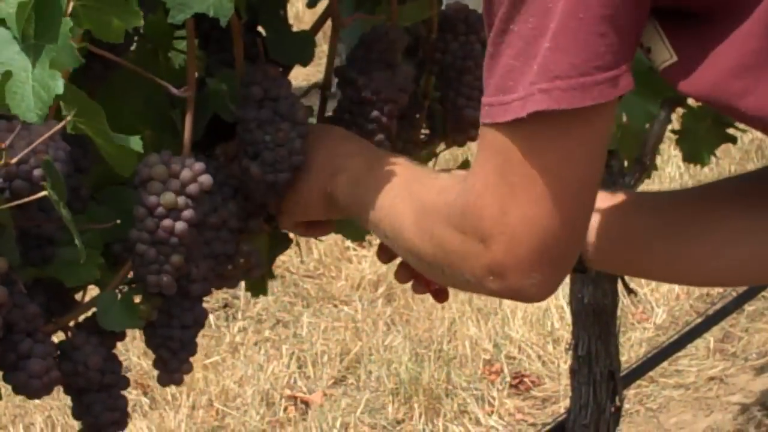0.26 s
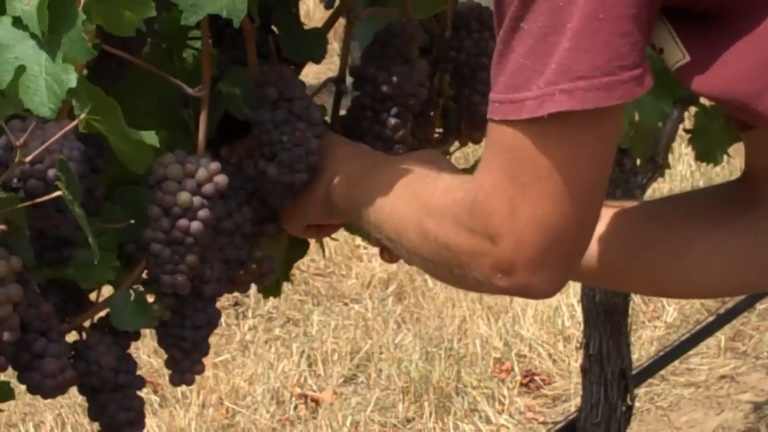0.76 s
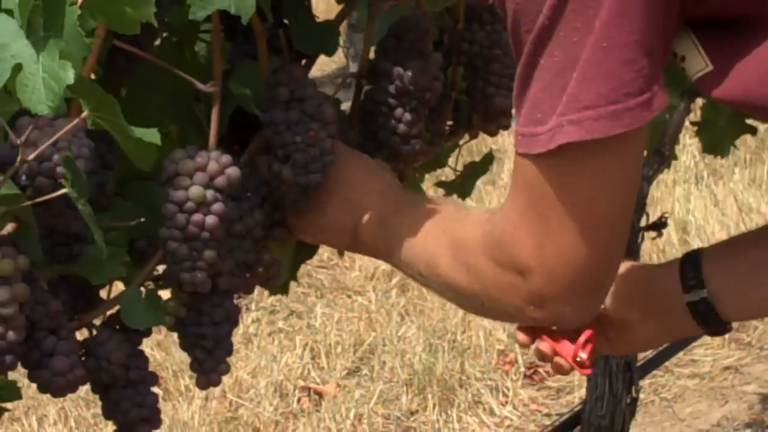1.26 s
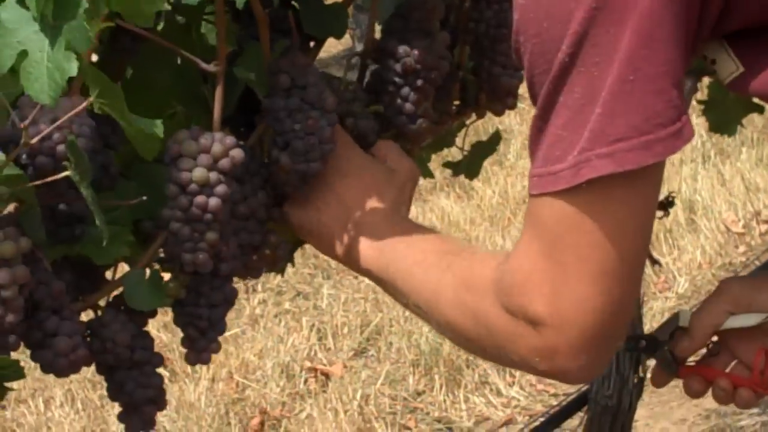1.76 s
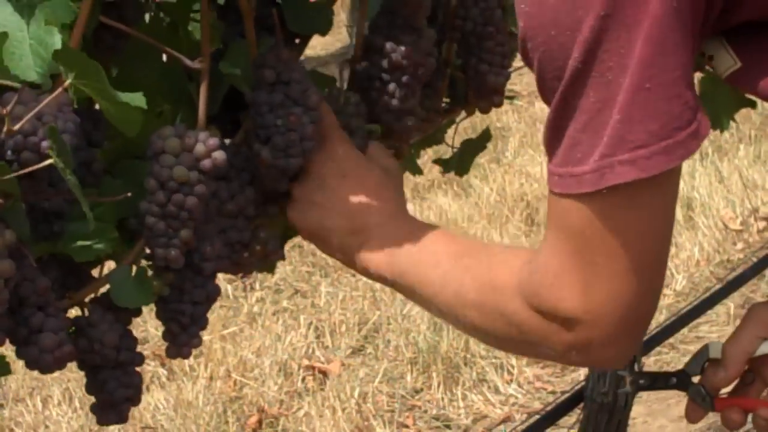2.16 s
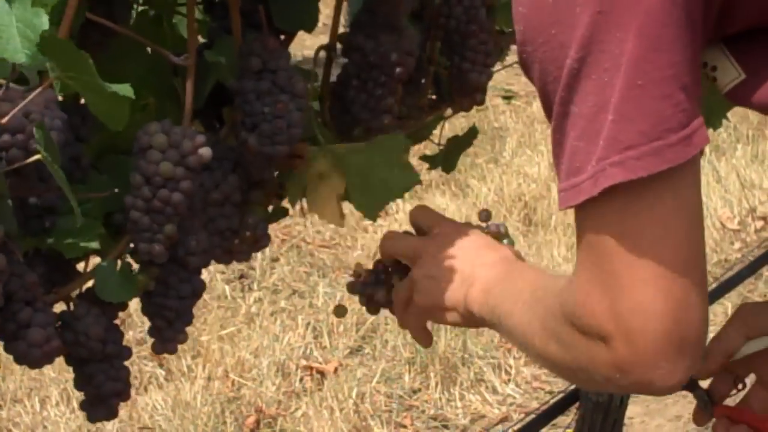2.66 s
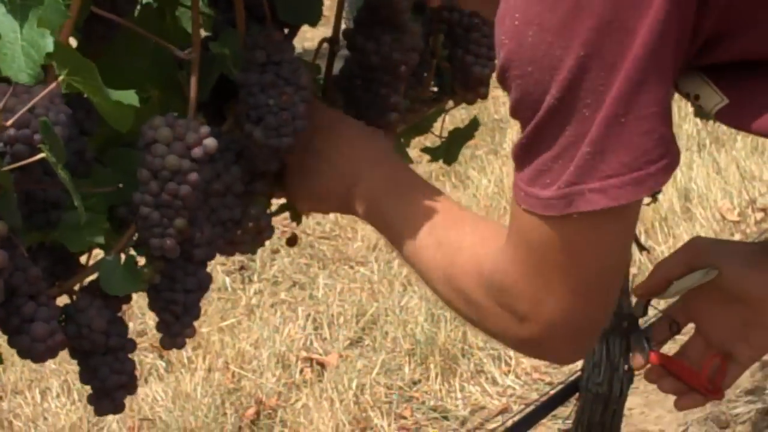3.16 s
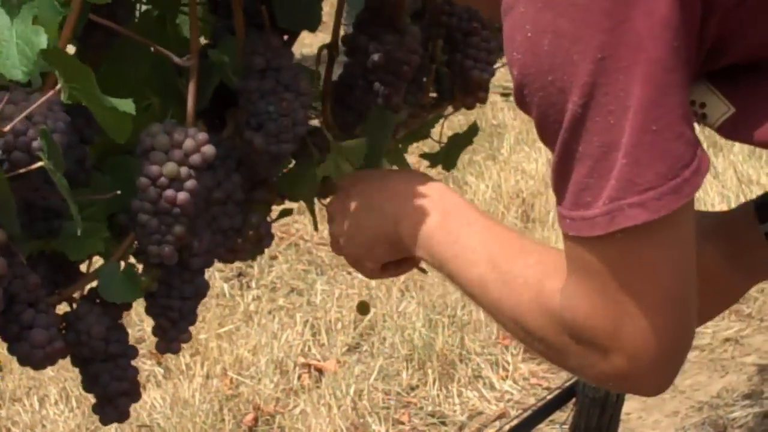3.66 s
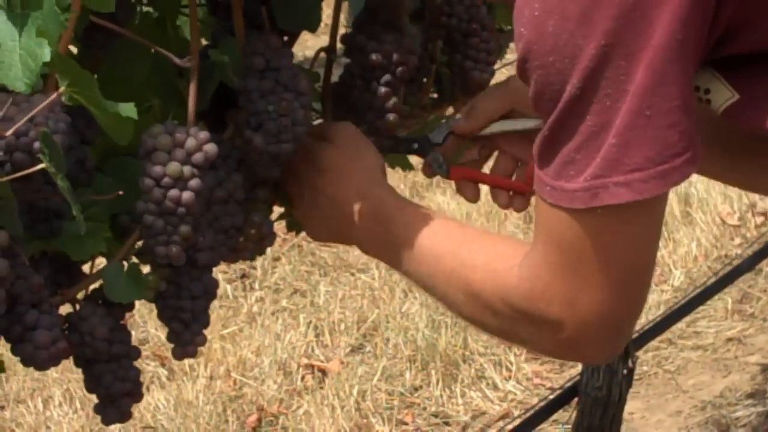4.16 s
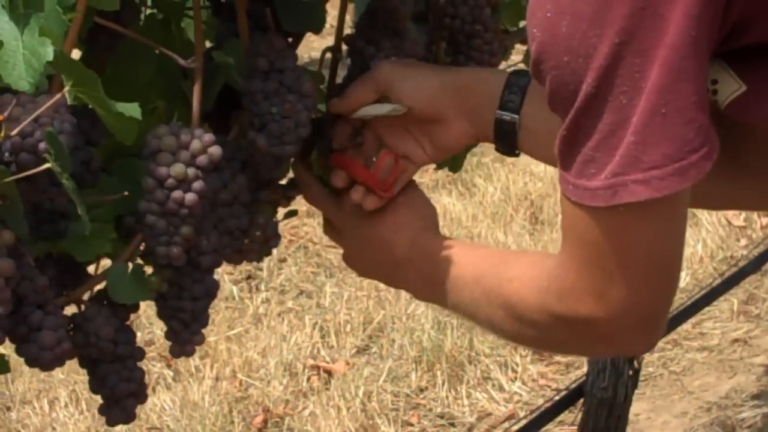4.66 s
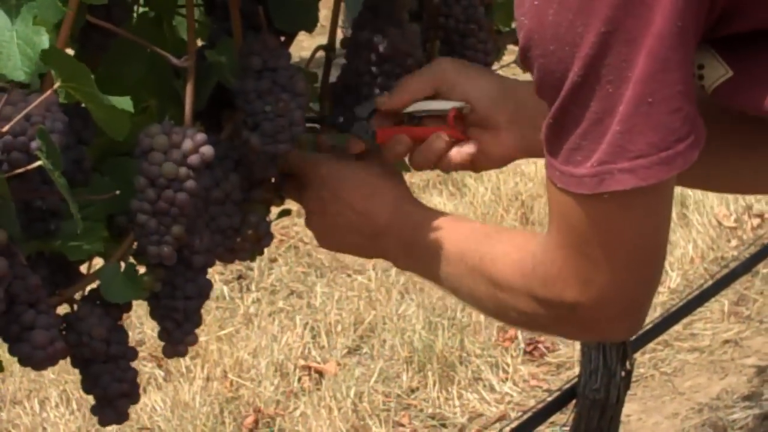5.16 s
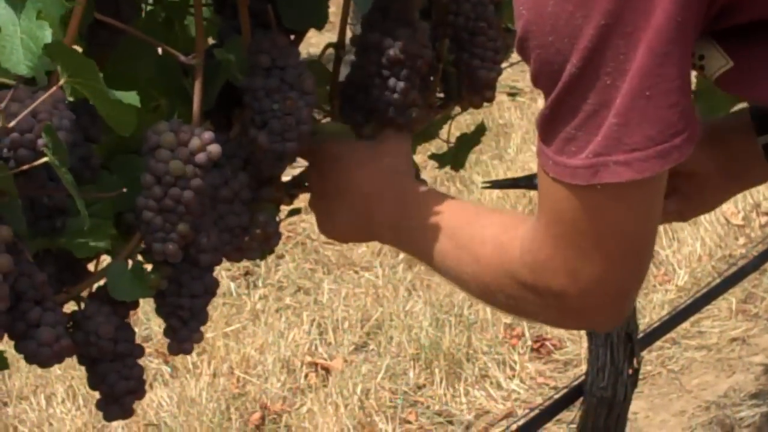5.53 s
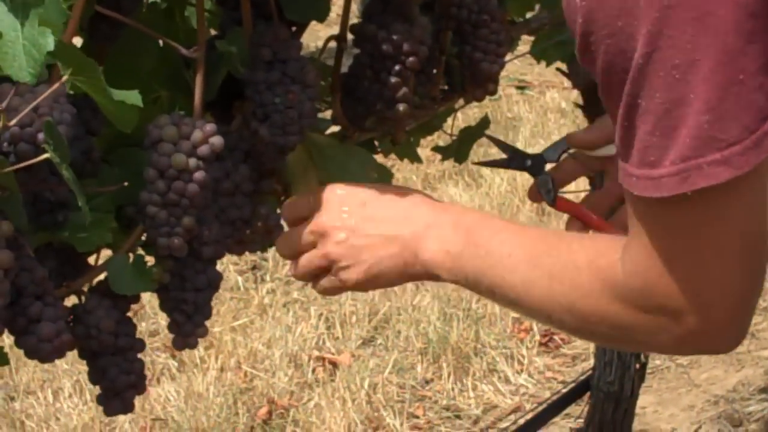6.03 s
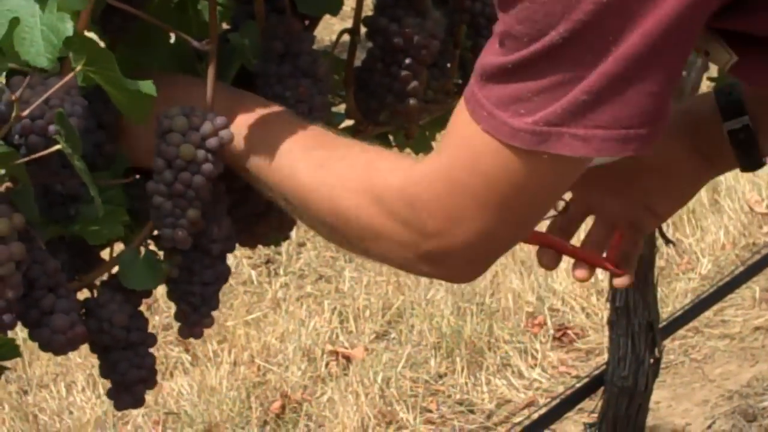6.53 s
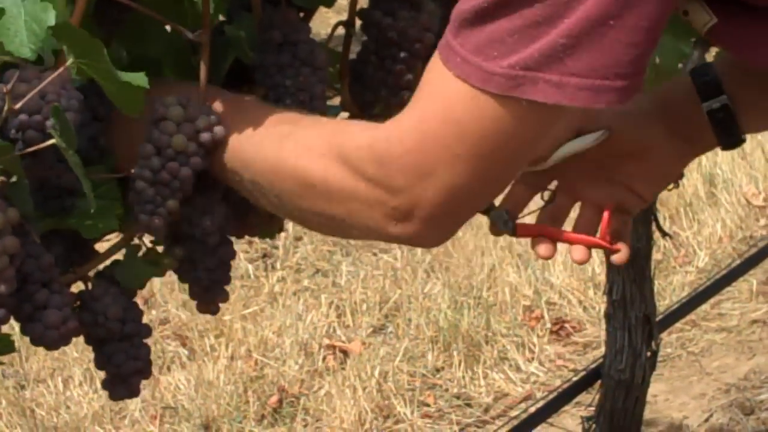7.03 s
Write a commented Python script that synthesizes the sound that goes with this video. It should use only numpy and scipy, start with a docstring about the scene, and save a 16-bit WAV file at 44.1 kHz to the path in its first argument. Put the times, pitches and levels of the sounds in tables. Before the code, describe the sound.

A close, dry mono scene outdoors on a calm day, over soft airy hiss and a faint low wind rumble. From 0 to 0.9 seconds leaves rustle lightly with a run of bright little cracks. At about 1.03 the pruning shears bite a stem and clack shut, a short hard metallic knock with a woody crunch. Sparse ticks follow, growing from 1.6. Between 2.3 and 3.1 hands push briskly through foliage: dense crackling, strong snaps and leafy swishes. A heavier, duller snap lands near 3.6, with a brush at 3.8 and a knock at 4.0. Rustling thins from 4.3 to 5. At about 5.1 the shears snip again, with a brief ring. Leaves stir, brushing harder around 5.9, with bright cracks at 6.0. Quieter rustling continues, with a few snaps near 6.9 and a swell of leaves towards the end at 7.3.

```python
"""Leaves rustle and crackle close by as a picker's hands push through a vineyard row on a calm day.
Rustling is crackle and friction noise in three colour bands; snaps are short bursts with a ringing stalk.
Twice the shears bite a stem and clack shut: contact forces ring handle and blade modes over a noisy crack.
Below lies a soft open-air hiss of shaped noise with a little wind rumble.
The baseline jumps now and then and settles back, and the top of the spectrum is cut."""
import sys
import numpy as np
from scipy import signal
from scipy.fft import rfft, irfft
from scipy.io import wavfile

SR = 44100
rng = np.random.default_rng(int(sys.argv[2]) if len(sys.argv) > 2 else 0)


def generate_wav(sig):
    """Save sig (samples, or channels by samples) to the path in sys.argv[1] as 16-bit PCM at SR."""
    pcm = np.round(np.clip(np.atleast_2d(sig).T, -1, 1) * 32767).astype(np.int16)
    wavfile.write(sys.argv[1], SR, pcm)


N = 321665


def rustle():
    """Rubbing leaves: clumped crackle plus ticks, its colour following the hand and wavering."""
    dull_gain, middle_gain, bright_gain = leaf_gains()
    clumps = from_db(0.14 * drift(29) + 1.74 * drift(53))
    crackling = crackle(N, per_s=3000, spread_db=2.1, hiss=1.73) * clumps
    ticking = from_db(-10.0) * ticks(per_s=250, cycles=26)
    dull, middle, bright = three_parts(crackling + ticking)
    dull_waver = from_db(1.7 * drift(34))
    bright_waver = from_db(2.57 * drift(15))
    return dull_gain * dull_waver * dull + middle_gain * middle + bright_gain * bright_waver * bright


# Leaves stirring all along, joined by straight lines; lifts are relative to the middle part:
# (time [s], middle level [dB], dull lift [dB], bright lift [dB])
STIRRING = [(0, -69, -6, 6), (.33, -69, 11.5, -4), (.55, -67.5, 11.5, 10), (.8, -67.5, 3, 2.5),
            (.97, -72, 14, 6), (1.3, -65.5, 1, 4.5), (1.6, -71, 10, 3), (2.0, -62, 4, 5.5),
            (2.38, -57.5, 6, 9), (2.69, -78, 13, 14), (3.0, -61.5, 9.5, 2), (3.9, -62.5, 8, 6),
            (4.3, -67.5, 6, 0.5), (4.6, -74, 8, 5), (5.0, -73.5, 10, 5), (5.25, -67, 4, 7.5),
            (5.45, -76, 3, 9.5), (5.75, -65, -4, -1), (5.98, -68, 8, 6), (6.3, -67, 8, 11),
            (6.6, -62, 10.5, 4.5), (6.8, -66.5, 11.5, 7.5), (7.29, -57.5, 8.5, 1)]
# A hand brushes through leaves:
# (peak time [s], middle level [dB], rise [s], fall [s], dull lift [dB], bright lift [dB])
HAND_BRUSHES = [(.178, -58, 0.022, 0.11, 5, 7), (.28, -58.5, 0.13, 0.043, 1, 13),
                (.37, -55.5, 0.014, 0.045, -2, 15.5), (.44, -54.5, 0.077, 0.019, -7, 9),
                (.89, -61, 0.061, 0.037, 5, 10.5), (1.01, -63, 0.029, 0.15, 8, 6),
                (1.37, -57.5, 0.023, 0.026, -1, 8.5), (1.53, -64, 0.21, 0.033, 13, 7),
                (1.73, -54.5, 0.14, 0.055, 2.5, 7.5), (1.84, -48, 0.01, 0.042, -12, 9),
                (2.11, -59, .1, 0.064, 4, 8), (2.22, -62, .15, 0.2, -11, 14.5),
                (2.34, -57, .07, .1, -8, 11.5), (2.438, -37, .025, .05, -6, 7), (2.56, -52, .03, .06, 2, 9),
                (2.62, -49.5, 0.14, 0.041, 2.5, 10), (2.731, -49, 0.0067, 0.078, 9.5, 3.5),
                (2.865, -55, 0.17, 0.013, 0, 9), (2.961, -51.5, 0.0063, 0.018, 8, 2),
                (3.041, -53.5, 0.0084, 0.027, 8, 8), (3.07, -50, 0.015, 0.22, 3, 10),
                (3.54, -50.5, 0.014, 0.17, -1, 3), (3.792, -46.5, 0.077, 0.029, -0.5, 2),
                (4.24, -56.5, 0.092, 0.077, -3, 1), (4.46, -60, 0.13, 0.06, 4.5, 4),
                (4.69, -62, 0.042, 0.046, 3, 4), (4.83, -64.5, 0.13, 0.021, 1, 1),
                (5.09, -56, 0.026, 0.18, 2, -3), (5.33, -60, 0.023, .05, 2, 2),
                (5.579, -56.5, 0.074, 0.098, 8, 1.5), (5.8, -54, 0.29, 0.11, 3, 1),
                (5.881, -46.5, .07, 0.038, -5.5, -1), (6.01, -49, 0.009, 0.051, 2, 5.5),
                (6.42, -79, 0.021, 0.32, -5, -6), (6.71, -56.5, .15, 0.067, 6, 4.5),
                (6.95, -57, 0.072, 0.057, 10.5, 9.5), (7.09, -58.5, 0.048, 0.069, 1, 8.5)]
BRUSH_SWING_DB = 10   # change in level over one rise or fall time


def leaf_gains():
    """Gains of the dull, middle and bright parts: powers of stirring and brushes add; brushes swing evenly in dB."""
    t = np.arange(0, N, 16) / SR
    times, *columns = np.transpose(STIRRING)
    level_db, dull_db, bright_db = [np.interp(t, times, column) for column in columns]
    power = from_db(level_db + np.array([dull_db, 0 * t, bright_db])) ** 2
    for peak_s, peak_db, rise_s, fall_s, dull_db, bright_db in HAND_BRUSHES:
        away = np.maximum((peak_s - t) / rise_s, (t - peak_s) / fall_s)
        lifts_db = np.array([[dull_db], [0], [bright_db]])
        power = power + from_db(peak_db - BRUSH_SWING_DB * away + lifts_db) ** 2
    return [np.interp(np.arange(N) / SR, t, np.sqrt(p)) for p in power]


# Range of tick pitches: (lowest [Hz], highest [Hz])
TICK_RANGE = 2100, 10140


def ticks(per_s, cycles):
    """Sparse ticks of leaf ribs and berries, dealt among 16 ringing pitches; rms 1."""
    sizes = crackle(N, per_s, spread_db=3.16, hiss=0)
    dealt = rng.integers(0, 16, N)
    pitches = np.geomspace(*TICK_RANGE, 16)
    # each tick falls 60 dB within the given number of cycles
    return rms_one(sum(ring(sizes * (dealt == k) + 1e-18, hz, cycles / hz) for k, hz in enumerate(pitches)))


# Leaf cracks and stalk snaps; the level is the reference for the spike, burst and knock:
# (time [s], reference level [dB], dull lift [dB], bright lift [dB], knock pitch [Hz])
LEAF_SNAPS = [(.157, -44.5, 1, 13, 3200), (0.2, -36.5, -1, 10, 5140), (0.2442, -40, -12, 15.5, 7140),
              (0.298, -37.5, 6, 2, 4790), (.3647, -43, -1, 6, 7980), (.383, -30.5, 2, 10, 4970),
              (0.4037, -38, 3, 3, 5560), (0.4466, -30.5, -1, 10.5, 4970), (0.531, -52, 0, 6, 7400),
              (.544, -36.5, 1, 13, 5560), (.599, -40, -11, 3, 4100), (0.635, -42, -2, 10, 4430),
              (.7785, -43.5, -5, 9, 5200), (0.8387, -38, 11, 10.5, 3900), (0.864, -40, 0, 7, 7000),
              (.876, -37, -5, 6, 5650), (0.9075, -38, 0, 11.5, 5610), (0.928, -41, 4, 11, 5360),
              (0.9932, -38, 3, 14, 2930), (1.3508, -42.5, 8, 11.5, 4640), (1.516, -41, 3, 13.5, 6560),
              (1.634, -40.5, 3, 11, 4990), (1.711, -34.5, -2, 11.5, 2930), (1.8145, -29.5, -5, 10, 8250),
              (1.9099, -32.5, 0, 7.5, 5190), (2.0487, -34.5, 0, 9, 4440), (2.079, -36.5, 3, 19.5, 8800),
              (2.1158, -32, 1, 13.5, 8010), (2.302, -45, 1, 16, 8680), (2.3299, -23, -8, 7.5, 3520),
              (2.3494, -35.5, -4, 20, 4290), (2.4016, -35, -4, 10, 4970), (2.4198, -31.5, 5, 17, 9000),
              (2.449, -30.5, 10, 14.5, 3850), (2.5382, -36, 15, 16.5, 7980), (2.5518, -35.5, 6, 17, 3360),
              (2.58, -24, -3, 9.5, 3000), (2.5945, -27, -4, 2, 7930), (2.619, -25, -4, 10, 2960),
              (2.7038, -27, -5, 2.5, 5100), (2.7274, -25, 4, 11.5, 3660), (2.765, -35, 13, 0, 2080),
              (2.7945, -28.5, -6, 2, 4300), (2.849, -37.5, -1, 5, 2820), (2.947, -41.5, -8, 15, 8880),
              (2.972, -42, 3, 3, 4000), (3.035, -29.5, 10, 2, 5570), (3.0414, -22, 8, 8, 3880),
              (3.0716, -37, 6, 12, 5250), (3.16, -42.5, -1, 19, 9000), (3.21, -36, -11, 4, 6200),
              (3.2385, -33.5, -8, -18, 2430), (3.2783, -34.5, 1, -1, 2760), (3.4084, -42, 3, 11, 5150),
              (3.5866, -21, 11, 8, 2100), (3.589, -31.5, 4, -4, 1150), (3.591, -39, -6, 2, 2940),
              (3.6286, -32.5, 0, -8, 4300), (3.9567, -51, -3, 7, 2500), (3.9892, -28.5, 1, -14, 3380),
              (4.042, -40.5, 1, 9, 4960), (4.0728, -36, 6.5, 17, 7700), (4.37, -38.5, -11, 4, 6000),
              (4.5757, -48, 1, 8, 3470), (4.776, -39.5, -4, 2, 4900), (5.063, -45, 3, 9, 2870),
              (5.0722, -38, 9, -3, 3840), (5.4306, -48, 5, 10, 5100), (5.5617, -34.5, 5.5, -8, 4930),
              (6.0053, -60, -2, -5, 3490), (6.0138, -32, -6, 2, 3370), (6.0207, -30.5, -6, 10, 7650),
              (6.0275, -25.5, -0.5, 13, 7900), (6.1378, -42.5, 1, 6, 2950), (6.2557, -45.5, 12, 12, 8440),
              (6.345, -47, -6, 11, 7000), (6.405, -43, -15, 14.5, 2980), (6.421, -42, -7, -1, 3540),
              (6.497, -42.5, 7, 9.5, 3030), (6.732, -40.5, 13, 10.5, 2180), (6.934, -36, 1, 11, 4000),
              (6.942, -33, 7, 5, 4230), (6.96, -44, 1, 8, 9500), (7.097, -43, 8, 9, 4000),
              (7.227, -37, 17, -2, 2750)]
BURST_DB, SPIKE_DB, KNOCK_DB = -10, -13, -6.5   # re the reference level
BURST_T60_S, SPIKE_T60_S = 0.028, 0.0071
KNOCK_CYCLES = 32     # cycles in which the knock falls 60 dB
SNAP_LOW_HZ = 645     # stalks carry little bass


def snaps():
    """A sharp break and a coloured burst, with a knock that sets the stalk ringing briefly."""
    out = np.zeros(N)
    tap = np.arange(3000) == 20   # a single click, 20 samples in
    for s, level_db, dull_db, bright_db, knock_hz in LEAF_SNAPS:
        add(out, s, burst(level_db + BURST_DB, dull_db, bright_db, BURST_T60_S, rise_ms=1.0))
        add(out, s, burst(level_db + SPIKE_DB, dull_db, bright_db, SPIKE_T60_S, rise_ms=0.45, size=1024))
        knock = ring(tap + 1e-18, knock_hz, KNOCK_CYCLES / knock_hz)
        add(out, s, from_db(level_db + KNOCK_DB) * knock)
    return signal.sosfilt(signal.butter(4, SNAP_LOW_HZ, "high", fs=SR, output="sos"), out)


def burst(level_db, dull_db, bright_db, t60, rise_ms, size=4096):
    """A sudden break: crackle that starts fast and dies away, with a fainter tail scattered by the foliage."""
    t = np.arange(size) / SR
    rise = 1 - np.exp(-1000 * t / rise_ms)
    tail = from_db(-27 - 60 * t / 0.17)
    fade = from_db(-60 * t / t60) + tail
    dull, middle, bright = three_parts(crackle(size, per_s=5000, spread_db=5.1, hiss=1.0))
    return from_db(level_db) * rise * fade * (from_db(dull_db) * dull + middle + from_db(bright_db) * bright)


# Contacts of the shears: light bites, the clack, then weaker contacts; the grip shifts and damps the modes:
# (time [s], ring level [dB], handle t60 [s], contact decay time [ms], first handle mode [Hz],
# second handle mode [Hz], second mode level re first [dB], crack level [dB], dull lift [dB],
# bright lift [dB], crack t60 [s])
SHEAR_CONTACTS = [(1.017, -25, 0.013, 2, 1980, 3900, -12, -48, 4, -8, 0.045),
                  (1.0295, -18.5, 0.022, 0.88, 2060, 2920, -12, -33.5, -4, 1, 0.034),
                  (1.0344, -22.5, 0.029, .1, 3000, 3990, -0.5, -26.5, 7, 9.5, 0.032),
                  (1.0372, -8, 0.012, 0.19, 2100, 3950, -32, -35.5, 14, 3, 0.027),
                  (1.05, -31, 0.018, 1.5, 2780, 1150, -1, -40, 7, -4, 0.078),
                  (5.0902, -28, .02, .8, 2430, 2790, -11, -40, -6, 5.5, 0.028),
                  (5.094, -30, 0.059, 0.37, 1887, 3870, 10.5, -39.5, 4.5, 1, 0.06),
                  (5.105, -9, 0.019, 0.82, 2436, 2800, 6.5, -30, 3, 12, 0.016),
                  (5.113, -32, 0.037, 0.88, 2320, 2710, 7, -60, -3, -13, 0.06),
                  (5.125, -39, 0.04, 0.88, 2350, 2920, 3, -62, -1, -6, 0.051)]
# Thud of the hand, then the blade modes: (frequency [Hz], level re ring [dB], t60 [s])
THUD_AND_BLADES = [(273, -17, 0.017), (560, -28.5, 0.024), (1150, -25, 0.048), (4000, -38, 0.026),
                   (6500, -39, .025), (7260, -29, .025), (8700, -26, .03)]
CRACK_TOP_HZ = 11200   # the stem's crack is duller than leaves at the very top


def shears():
    """Each contact's push swings at the first handle mode's pitch while it decays, ringing handles and blades."""
    out, t = np.zeros(N), np.arange(6000) / SR
    duller = signal.butter(4, CRACK_TOP_HZ, fs=SR, output="sos")
    for s, ring_db, t60, contact_ms, first_hz, second_hz, second_db, *crack in SHEAR_CONTACTS:
        push = np.exp(-1000 * t / contact_ms) + 1e-18
        force = push * np.cos(2 * np.pi * first_hz * t) / np.sum(push)
        modes = [(first_hz, 0, t60), (second_hz, second_db, t60)] + THUD_AND_BLADES
        ringing = sum(from_db(db) * ring(force, hz, decay) for hz, db, decay in modes)
        add(out, s, from_db(ring_db) * ringing)
        add(out, s, signal.sosfilt(duller, burst(*crack, rise_ms=0.1)))
    return out


# Colour of the open-air hiss: (frequency [Hz], relative density [dB per Hz])
AIR_COLOUR = [(110, -45), (180, -9), (374, -10), (686, -7), (980, -8.5), (1430, -6.5), (12800, -26),
              (16600, -59), (22000, -120)]
AIR_DB, RUMBLE_DB, RUMBLE_HZ = -69, -73, 118


def air():
    """Open-air hiss wavering a little, over a lumpy low-passed rumble of light wind."""
    hiss = rms_one(coloured(rng.standard_normal(N), AIR_COLOUR))
    low = signal.sosfilt(signal.butter(1, RUMBLE_HZ, fs=SR, output="sos"), rng.standard_normal(N))
    hiss_gain = from_db(AIR_DB + 1.1 * drift(14))
    rumble_gain = from_db(RUMBLE_DB + 1.3 * drift(6.4))
    return hiss_gain * hiss + rumble_gain * rms_one(low)


# Colour of leaf sound before its parts are weighted: (frequency [Hz], relative density [dB per Hz])
LEAF_COLOUR = [(180, -85), (300, -7), (959, -4), (1980, 5.5), (2970, 10), (4130, 9), (5150, 7), (9500, 1.5),
               (12800, -6), (16600, -61), (22000, -120)]
# Centres of the dull, middle and bright parts: (frequency [Hz])
PART_CENTRES = [1220, 3770, 11450]


def three_parts(x):
    """Leaf-coloured sound of rms 1 split into dull, middle and bright parts that blend into each other."""
    x = rms_one(coloured(x, LEAF_COLOUR))
    hz = bin_hz(x)
    return [irfft(rfft(x) * at_hz(list(zip(PART_CENTRES, share)), hz), len(x)) for share in np.eye(3)]


def crackle(size, per_s, spread_db, hiss):
    """Tiny breaks of uneven size at random moments, over a bed of friction noise."""
    sizes = from_db(spread_db * np.minimum(rng.exponential(1, size), 4))
    sizes = sizes * rng.choice([-1, 1], size)
    breaks = sizes * (rng.random(size) < per_s / SR)
    return rms_one(breaks) + hiss * rng.standard_normal(size)


def ring(force, hz, t60):
    """A damped resonator: a unit click sets a sine of height 1 ringing, 60 dB down after t60 seconds."""
    r, w = from_db(-60 / (t60 * SR)), 2 * np.pi * hz / SR
    return signal.lfilter([0, np.sin(w)], [1, -2 * r * np.cos(w), r * r], force)


def drift(rate):
    """Slow random wander of rms 1: noise at every 20th sample through two one-poles with corners at rate Hz."""
    r = np.exp(-40 * np.pi * rate / SR)
    slow = signal.lfilter([1], [1, -2 * r, r * r], rng.standard_normal(N // 20 + 2002))[2000:]
    return np.interp(np.arange(N) / 20, np.arange(len(slow)), rms_one(slow))


def coloured(x, points):
    """Sound shaped by a spectrum given in dB per Hz."""
    return irfft(rfft(x) * from_db(at_hz(points, bin_hz(x))), len(x))


def bin_hz(x):
    """Frequencies of the spectrum's bins, kept at 1 Hz or more for the logarithm."""
    return np.maximum(np.arange(len(x) // 2 + 1) * SR / len(x), 1)


def at_hz(points, hz):
    """Curve through the points, straight over log frequency."""
    return np.interp(np.log(hz), np.log(np.array(points)[:, 0]), np.array(points)[:, 1])


def from_db(db):
    """Amplitude gain for a level in dB."""
    return 10 ** (np.asarray(db) / 20)


def rms_one(x):
    """Sound scaled to rms 1."""
    return x / np.sqrt(np.mean(x ** 2) + 1e-20)


def add(out, s, sound):
    """Mixes a sound in at s seconds, cut at the end of the scene."""
    i = round(s * SR)
    out[i:i + len(sound)] += sound[:N - i]


def scene():
    """Leaves, snaps and shears over the open air, in one channel."""
    return (rustle() + snaps() + shears() + air())[None]


# Jumps of the baseline, before softening: (time [s], step [full scale = 1])
BASELINE_JUMPS = [(1.035, 0.0015), (1.409, -0.0017), (2.428, .0018), (2.974, -0.0025), (3.073, .0019),
                  (3.426, -0.002), (4.076, 0.0017), (4.419, -.0019), (5.103, .0016), (5.467, -0.0026)]
BASELINE, SETTLE_S = -0.00053, 0.089   # constant offset [full scale = 1], decay time constant
CUTOFF_HZ = 13050   # 80 dB down from here up


def record(dry):
    """The baseline jumps, softened, and settles back exponentially; a steep low-pass cuts the top."""
    steps = np.zeros(N)
    for s, step in BASELINE_JUMPS:
        steps[round(s * SR)] = step
    settling = signal.lfilter([1], [1, -np.exp(-1 / (SETTLE_S * SR))], steps)
    soft = signal.sosfilt(signal.butter(1, 150.0, fs=SR, output="sos"), settling)
    top_cut = signal.cheby2(30, 80, CUTOFF_HZ, fs=SR, output="sos")
    return signal.sosfilt(top_cut, dry + soft + BASELINE)


dry = scene()
out = record(dry)
generate_wav(out)
```